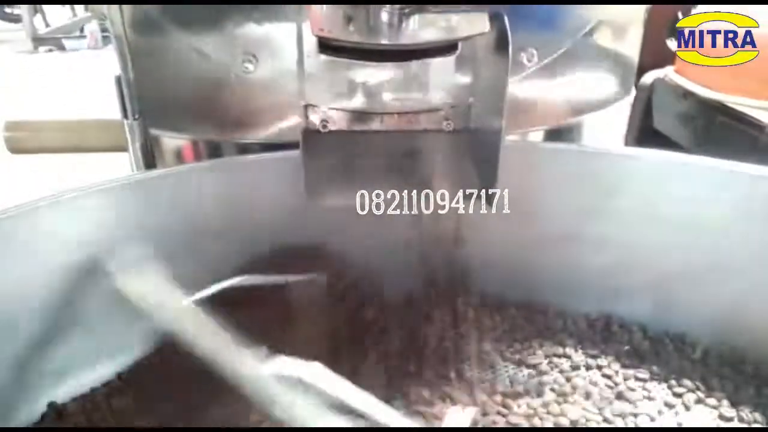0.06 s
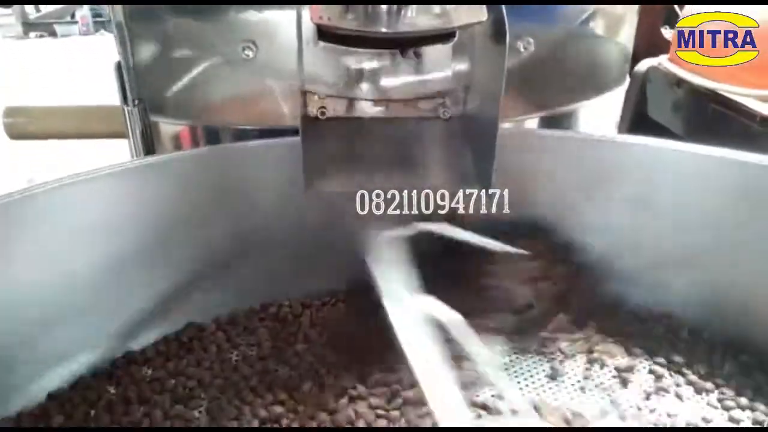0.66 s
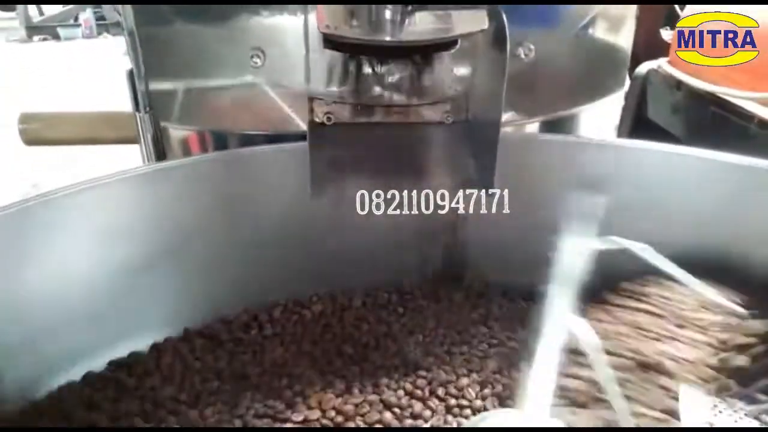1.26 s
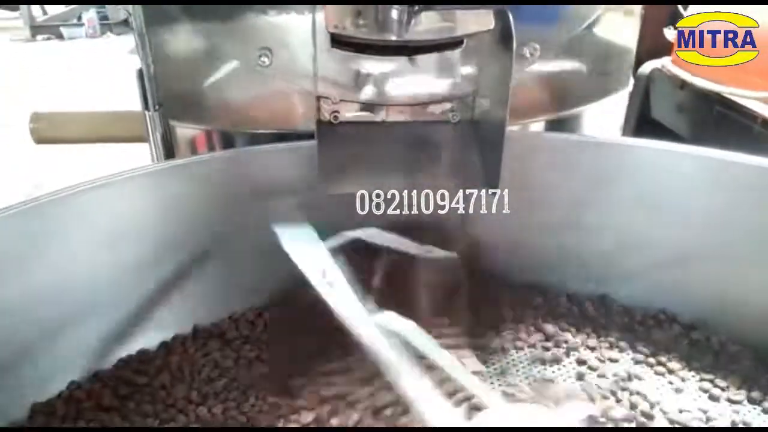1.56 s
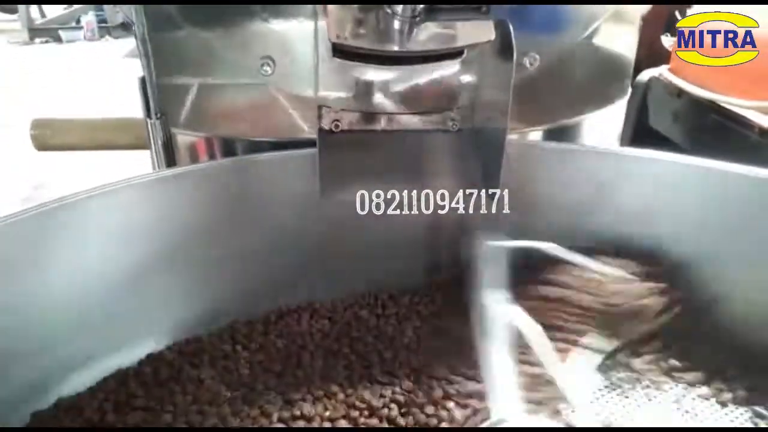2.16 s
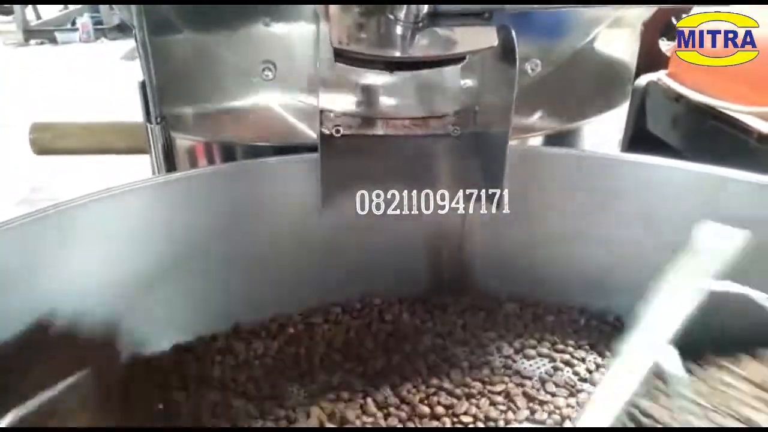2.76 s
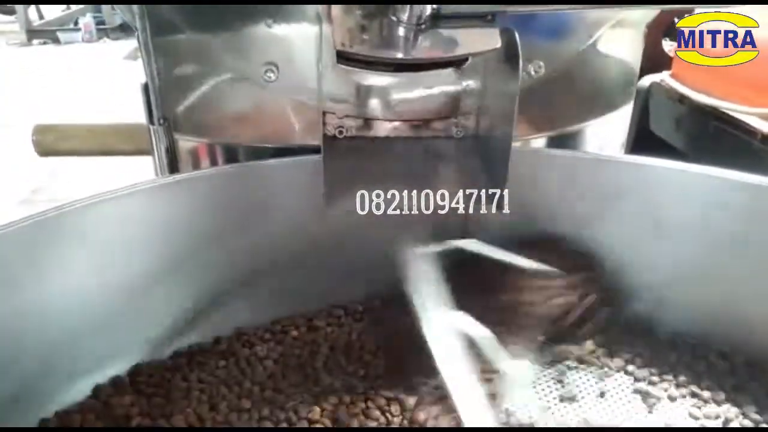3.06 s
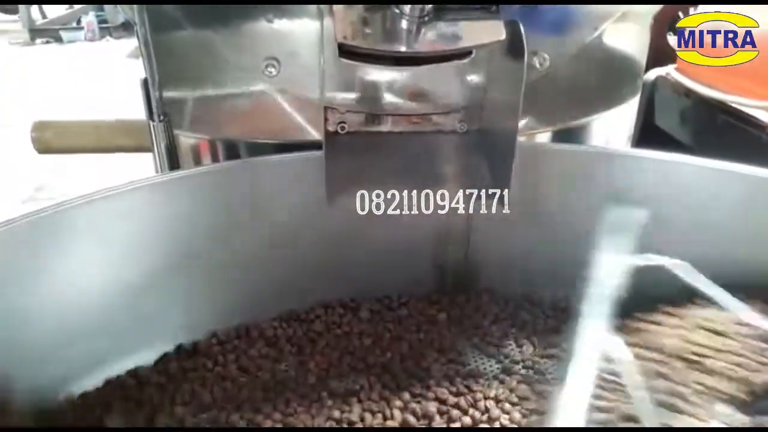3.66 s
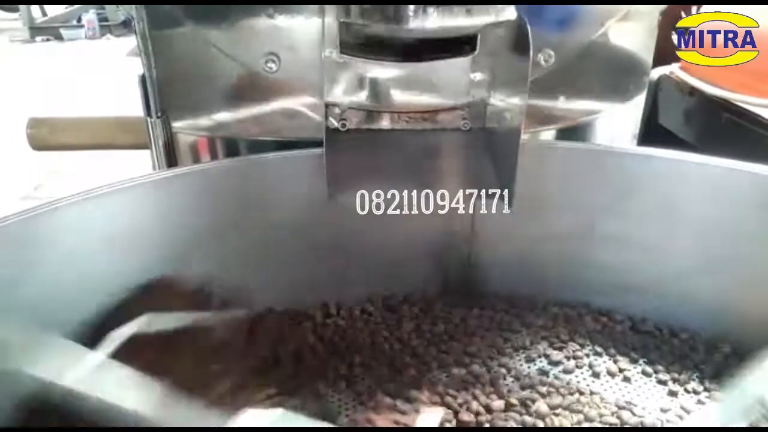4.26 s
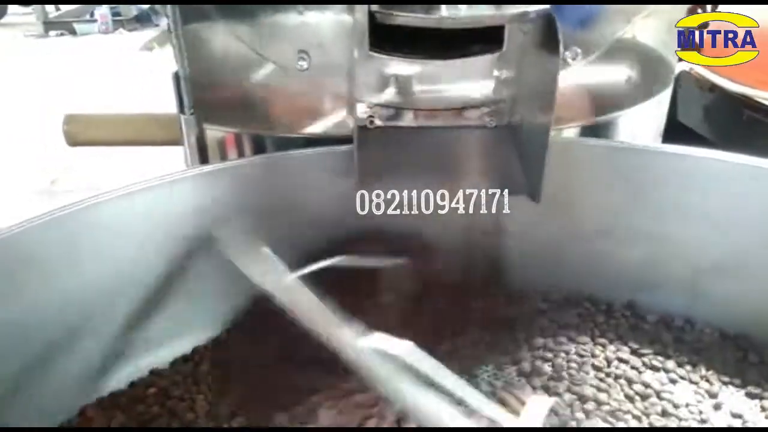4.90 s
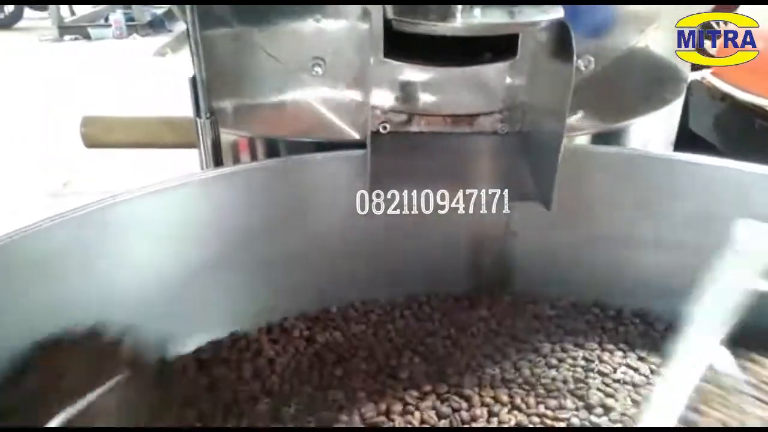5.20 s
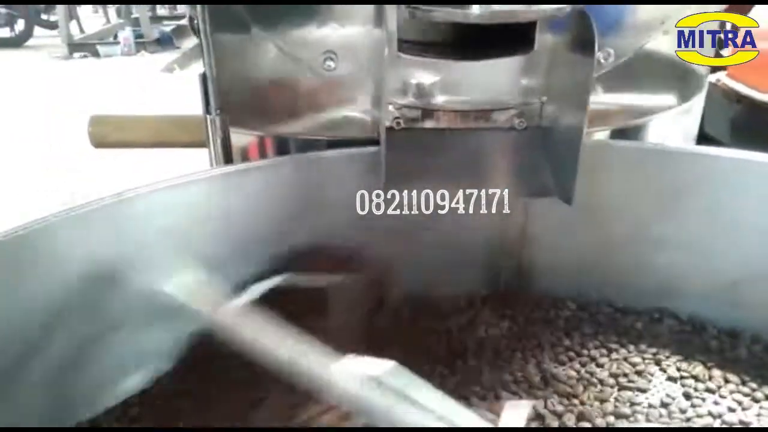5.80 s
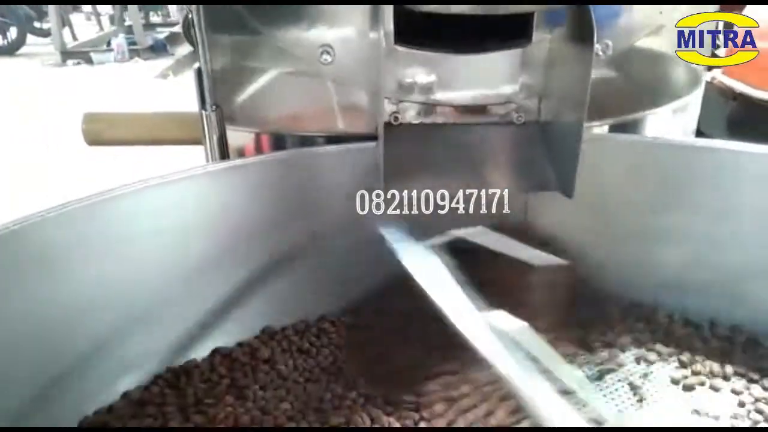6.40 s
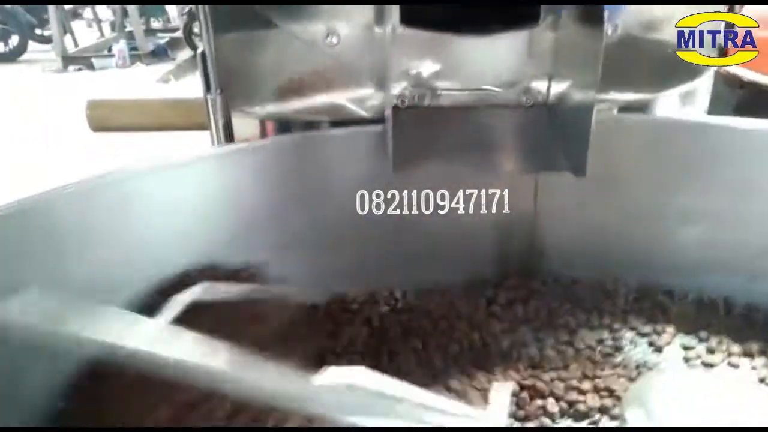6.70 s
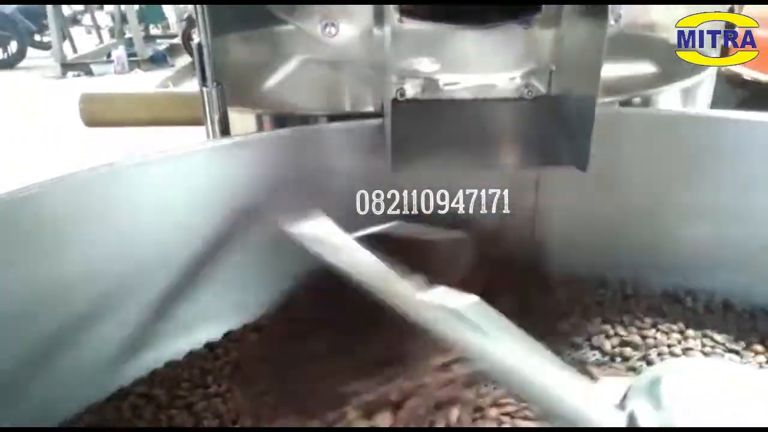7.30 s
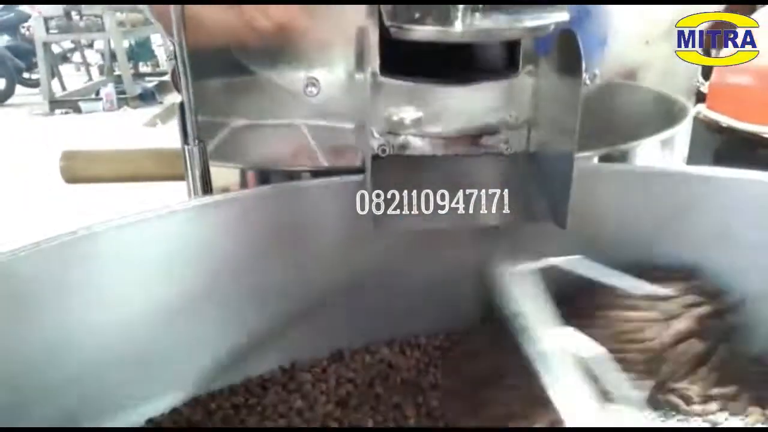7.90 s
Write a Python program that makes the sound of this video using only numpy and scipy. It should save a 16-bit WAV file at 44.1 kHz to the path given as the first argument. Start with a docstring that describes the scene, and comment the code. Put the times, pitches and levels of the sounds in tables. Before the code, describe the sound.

Steel paddles sweep roasted coffee beans round a perforated cooling tray, close to a hand-held microphone, for about eight seconds. Grinding swells with each pass, roughly every 0.8 seconds, and the dry beans hiss as they heap up and slide. The drum shudders and booms unevenly throughout, over a steady suction fan and a thin, wavering motor whine. Short steel squeaks come and go, noticeably around 0.5, 1.3, 2.9 and 4.5 seconds. Jammed beans snap free with brief metallic knocks at about 2.2 seconds, most sharply at 3.8, then several times between 4.3 and 6. A panel hums faintly and low from about 2.8 seconds and again from 7.2. Stronger booms gather around 3.9 and 6.5 seconds. The microphone takes one dull bump at 6.9 seconds, and a cluster of brighter squeaks and a knock arrives just before 8 as the stirring continues.

```python
"""Coffee roaster cooling tray.

Steel paddles sweep roasted beans round the tray, close to a hand-held microphone. The arms grind and
knock on the perforated floor, the drum booms and panels hum; the beans hiss as they heap up and slide.
Steel squeaks now and then and the microphone is bumped once. Underneath: a suction fan and the thin,
wavering whine of the motor."""
import sys
import numpy as np
from scipy import signal
from scipy.fft import rfft, irfft
from scipy.io import wavfile
from scipy.ndimage import uniform_filter1d

SR = 44100
rng = np.random.default_rng(int(sys.argv[2]) if len(sys.argv) > 2 else 0)


def master(y):
    """Save y as 16-bit WAV."""
    cut = np.clip(np.atleast_2d(y).T, -1, 1)
    pcm = np.round(cut * 32767)  # scale
    wavfile.write(sys.argv[1], SR, pcm.astype(np.int16))


N = 355005
T = np.arange(N) / SR
SLOW_T = T[::64]

# A paddle passes the microphone. Each row: nearest point in seconds, time to draw away in seconds,
# then relative grinding, hiss and bite (treble gain), all in dB.
PADDLE_PASSES = [(.58, 0.15, -28, -33.5, 2), (1.4, 0.29, -23, -29.5, -2), (2.23, .18, -25.5, -36, 2),
                 (3.03, 0.11, -22, -27.5, 0), (3.88, 0.21, -26, -30, 2), (4.65, 0.4, -24.5, -28, -4.5),
                 (5.49, 0.29, -25, -30.5, -0.5), (6.28, 0.41, -25, -33.5, 0), (6.97, .17, -35, -31, 0.5),
                 (7.94, 0.11, -23, -27, -0.5)]
# A heap gives way before a paddle. Each row: start and length in seconds, relative grinding and hiss in dB.
HEAP_SLIPS = [(-.03, 0.17, -34, -26), (0.332, .02, -27.5, -48), (0.422, .06, -28, -33),
              (0.543, 0.071, -29.5, -42), (0.814, 0.091, -25, -30.5), (1.424, .12, -45, -25),
              (1.606, 0.084, -28.5, -31), (1.757, .03, -30, -27.5), (1.985, 0.042, -30, -36),
              (2.404, .13, -28, -40), (2.693, 0.051, -29.5, -31), (3.158, 0.13, -31, -38),
              (3.358, 0.14, -31, -35.5), (3.623, .027, -34, -31.5), (4.089, 0.042, -29.5, -29),
              (4.34, .03, -30, -34), (5.088, 0.083, -27, -52), (5.444, .02, -26.5, -26),
              (5.624, 0.2, -28.5, -27.5), (5.895, 0.14, -33, -31.5), (6.499, 0.22, -26, -33.5),
              (6.783, 0.09, -23, -29), (7.034, 0.12, -31.5, -26), (7.556, 0.059, -26, -30),
              (7.874, 0.018, -32, -23)]
# Broad spectra of tray, beans, drum and fan. Each row: frequency in Hz, relative density in dB.
TRAY_SPECTRUM = [(60, -45.5), (200, -3), (280, -6), (450, -2.5), (750, 1), (1300, 2.5), (1900, -0.5),
                 (2400, -1), (2800, -7), (3300, -13.5), (4000, -15.5), (5500, -16), (8000, -17.5),
                 (14000, -49)]
BEAN_SPECTRUM = [(500, -12.5), (2000, 2.5), (3800, -11), (4800, -9.5), (5600, -4.5), (7200, -3.5),
                 (8300, 0), (10000, 1.5), (12000, 1), (14300, -1)]
DRUM_SPECTRUM = [(30, -41), (55, -14), (80, -14.5), (100, -5), (118, -8.5), (145, 0.5), (178, 3.5),
                 (195, -4.5), (212, -14.5), (270, -19), (380, -39), (900, -57)]
FAN_SPECTRUM = [(20, -35), (36, -6), (58, -1), (100, 23.5), (170, -4), (260, 3), (450, 11.5), (800, 11),
                (1700, -20), (2600, 8), (3600, -11.5), (5500, 8), (9000, -13), (14000, 8.5)]
# Tray modes. Each row: centre in Hz, width in Hz, gain in dB (negative for a dead spot).
TRAY_RESONANCES = [(324, 33, 9.5), (374, 26.3, -20), (466, 42, 5), (521, 35, -12), (590, 24, 3.5),
                   (665, 31, -7.5), (755, 17, 7.5), (904, 70, 5.5), (987.7, 31, 9), (1087, 130, -6),
                   (1326, 39, 3), (1629, 67, 4), (1695, 69, 6.5), (2310, 43, 4), (2720, 30, 9)]
# An arm jolts the drum hard. Each row: time in seconds, relative level in dB, pitch in Hz.
DRUM_BOOMS = [(.071, -20, 158), (.271, -12, 163), (.336, -16, 170.4), (0.897, -16, 176), (1.451, -17, 158),
              (1.509, -15.5, 149), (1.78, -13, 167), (1.912, -17, 169.6), (2.165, -17.5, 171),
              (2.227, -12.5, 152), (2.538, -15, 176), (2.739, -21, 154), (2.835, -20.5, 156),
              (3.384, -14.5, 177), (3.861, -18, 172.5), (3.906, -11.5, 170.5), (3.962, -14.5, 162),
              (4.35, -20, 169), (4.479, -16, 160), (5.008, -18, 172), (5.418, -14, 175.6),
              (5.799, -14.5, 176), (5.999, -17, 168), (6.379, -14, 177), (6.418, -10.5, 173),
              (6.46, -17, 171), (6.581, -11, 163), (7.079, -15.5, 173.4), (7.74, -16.5, 166)]
# Drum shudder between booms. Each row: time in seconds, level in dB.
DRUM_SHUDDER = [(0, -31.5), (.75, -35), (3.1, -34.5), (3.6, -31), (4.2, -35.5), (4.55, -29.5), (6.5, -32),
                (7.35, -34), (8.05, -30.5)]
# A jammed bean snaps free. Each row: start in seconds, level in dB, ring pitch in Hz.
BEAN_SNAPS = [(2.238, -22, 1430), (3.846, -17, 2140), (4.338, -27.5, 1340), (4.519, -27, 991),
              (4.663, -22.5, 1260), (4.808, -21.5, 1760), (5.482, -19.5, 1310), (5.704, -21, 1730),
              (5.804, -22, 1290), (6.016, -26, 1620), (7.053, -22.5, 1490), (7.949, -19.5, 1280)]
# An arm scrapes steel. Each row: start in seconds, length in seconds, pitch in Hz, relative level in dB.
STEEL_SQUEAKS = [(0, 0.079, 7765, -30), (0, 0.24, 8250, -33), (0.398, 0.26, 749, -29.5),
                 (0.515, 0.15, 991, -25.5), (0.762, 0.084, 740, -30), (1.24, 0.22, 991, -23.5),
                 (1.413, .14, 2680, -30), (1.46, .086, 11280, -30), (2.103, 0.083, 5630, -35),
                 (2.111, 0.09, 1610, -32), (2.734, 0.13, 603, -33), (2.826, 0.26, 1647, -28.5),
                 (2.997, .11, 597, -28), (4.104, .11, 1726, -30.5), (4.495, 0.21, 990, -27),
                 (5.438, .055, 5700, -33), (5.636, .17, 1737, -28), (7.758, 0.13, 1357, -23.5),
                 (7.827, 0.12, 6700, -27), (7.828, 0.1, 4150, -37), (7.879, 0.022, 9650, -19),
                 (7.903, 0.056, 1720, -20.5)]
# A large panel hums. Each row: start in seconds, pitch in Hz, relative level in dB, T60 in seconds.
PANEL_HUMS = [(.58, 56, -45, 2), (2.8, 60.3, -31, 3.4), (7.169, 73.5, -31, 5.2)]
# The whine sags and recovers with motor load. Each row: time in seconds, pitch in Hz.
WHINE_PITCH = [(0, 5375), (.3, 5355), (.8, 5185), (1.48, 5145), (1.88, 5340), (2.8, 5378), (4.55, 5524),
               (5.05, 5492), (5.65, 5528), (6.8, 5422), (7.15, 5370), (8.05, 5386)]
# The whine flares. Each row: peak time in seconds, half length in seconds, level in dB.
WHINE_FLARES = [(.34, .06, -43), (.83, .06, -43), (1.72, .05, -41), (2.306, 0.089, -41), (2.68, 0.15, -44),
                (4.58, .13, -39), (6.79, 0.074, -43), (7.208, 0.094, -45), (7.95, 0.18, -41.5)]


def grinding(effort, level_db=-0.5, judder_db=0.76, bite_hz=1900):
    """Beans dragged over the holes tap the tray; each contact briefly excites modes of the steel."""
    taps = impacts(per_s=5000, spread_db=2.5) * amp(judder_db * drift(47))
    taps = patchy(taps, depth_db=4.0, length_s=0.05, width_hz=150)
    treble = signal.sosfiltfilt(signal.butter(4, bite_hz, "high", fs=SR, output="sos"), taps)
    bite = amp(curve(PADDLE_PASSES, column=4))  # a sharper bite lifts the upper modes
    drive = taps - treble + treble * bite
    return unit(colour(drive, TRAY_SPECTRUM, TRAY_RESONANCES)) * effort * amp(level_db)


def bean_hiss(flow, level_db=2.0, clump_db=1.36):
    """Thousands of dry beans tick against each other and the steel, sliding in clumps."""
    ticks = impacts(per_s=15000, spread_db=1.5) * amp(clump_db * drift(27))
    ticks = patchy(ticks, depth_db=2.15, length_s=0.07, width_hz=260)
    return unit(colour(ticks, BEAN_SPECTRUM)) * flow * amp(level_db)


def stirring(approach_s=0.38, hiss_swell_s=0.25, far_grind_db=-35.5, far_hiss_db=-37.5):
    """Grinding and hiss gains: steady far paddles, plus passing paddles and slipping heaps."""
    grind, hiss = [], []
    for nearest_s, leave_s, grind_db, hiss_db, _ in PADDLE_PASSES:
        grind.append(amp(grind_db) * swell(nearest_s, approach_s, leave_s))
        hiss.append(amp(hiss_db) * swell(nearest_s, hiss_swell_s, hiss_swell_s))
    for start_s, length_s, grind_db, hiss_db in HEAP_SLIPS:
        slide = heap_slip(start_s, length_s)
        grind.append(amp(grind_db) * slide)
        hiss.append(amp(hiss_db) * slide)
    return power_sum(far_grind_db, grind), power_sum(far_hiss_db, hiss)


def heap_slip(start_s, length_s, attack_s=0.018, release_s=0.12):
    """Envelope of a heap that gives way, slides and settles."""
    t = SLOW_T - start_s
    return np.clip(t / attack_s, 0, 1) * np.exp(-np.maximum(t - length_s, 0) / release_s)


def drum(uneven_db=2.2, boom_db=-4, rise_s=0.019, lead_s=0.00787):
    """The drum shudders unevenly under the arms and booms at each hard jolt."""
    jolts = impacts(per_s=500, spread_db=2) * amp(uneven_db * drift(11))
    out = unit(colour(jolts, DRUM_SPECTRUM)) * amp(curve(DRUM_SHUDDER))
    t = T[:SR // 4]
    envelope = (t / rise_s) ** 2 * np.exp(2 - 2 * t / rise_s)
    for at_s, db, hz in DRUM_BOOMS:
        add(out, at_s - lead_s, amp(db + boom_db) * envelope * np.sin(2 * np.pi * hz * t))
    return out


def knocks(t60_s=0.13, ring_width_hz=550, crack_gain=0.58):
    """A bean jams under a paddle and snaps free: a short tray rattle, strongest round one pitch."""
    out, t = np.zeros(N), T[:SR // 5]
    for start_s, db, hz in BEAN_SNAPS:
        rattle = rng.standard_normal(len(t))
        ring = unit(resonate(rattle, hz, ring_width_hz))
        blow = (ring + crack_gain * rattle) * amp(-60 * t / t60_s)
        knock = colour(blow, TRAY_SPECTRUM, TRAY_RESONANCES)
        add(out, start_s, amp(db) * knock / np.std(knock[:SR // 100]))
    return out


def squeaks(level_db=-5.0, rough_db=3, shake_at_1khz_hz=15):
    """Rubbing sustains a steel mode; stick-slip shakes its level and pitch, high pitches the most."""
    out = np.zeros(N)
    shake, roughness = drift(136), amp(rough_db * drift(70))
    for start_s, length_s, hz, db in STEEL_SQUEAKS:
        span = int(length_s * SR)
        offset = rng.integers(N - SR)
        pitch_hz = hz + shake_at_1khz_hz * np.sqrt(hz / 1000) * shake[offset:][:span]
        ring = np.sin(2 * np.pi * np.cumsum(pitch_hz) / SR) * roughness[offset:][:span]
        add(out, start_s, amp(db + level_db) * unit(ring * signal.windows.tukey(span, 0.5)))
    return out


def panel_hums(rise_s=0.013, waver_db=3.0):
    """A low panel mode swells quickly and dies slowly, wavering."""
    out = np.zeros(N)
    for start_s, hz, db, t60_s in PANEL_HUMS:
        envelope = amp(db - 60 * T / t60_s) * (1 - np.exp(-T / rise_s))
        add(out, start_s, envelope * np.sqrt(2) * np.sin(2 * np.pi * hz * T))
    return out * amp(waver_db * drift(8))


def microphone_bump(start_s=6.8965, wobble_hz=57, wobble_db=-7, rise_s=0.001, t60_s=0.11):
    """Two dull taps on the microphone case and the low wobble they start."""
    out, t = np.zeros(N), T[:SR // 5]
    envelope = amp(wobble_db - 60 * t / t60_s) * (1 - np.exp(-t / rise_s))
    add(out, start_s, envelope * np.sin(2 * np.pi * wobble_hz * t + np.pi / 5))
    for at_s, width_s, tap_db in [(6.8956, 0.00096, -4.5), (6.9021, 0.00019, -2.5)]:
        out -= amp(tap_db) * np.exp(-((T - at_s) / width_s) ** 2)
    return out


def fan(level_db=-38):
    """Air drawn through the tray: steady noise coloured by its modes."""
    return amp(level_db) * unit(colour(rng.standard_normal(N), FAN_SPECTRUM, TRAY_RESONANCES))


def motor_whine(steady_db=-51, jitter_ratio=0.0025, flutter_db=3):
    """The motor's faint tone wanders, flutters and flares."""
    pitch_hz = curve(WHINE_PITCH) * (1 + jitter_ratio * drift(220))
    tone = np.sin(2 * np.pi * np.cumsum(pitch_hz) / SR)
    flutter = amp(flutter_db * drift(35))
    flares = [amp(db) * swell(peak_s, half_s, half_s) for peak_s, half_s, db in WHINE_FLARES]
    return unit(tone * flutter) * power_sum(steady_db, flares)


def impacts(per_s, spread_db):
    """Random clicks, most small, a few large; rms 1."""
    size = amp(spread_db * np.minimum(rng.exponential(1, N), 4))
    return unit(size * rng.choice([-1, 1], N) * (rng.random(N) < per_s / SR))


def patchy(x, depth_db, length_s, width_hz):
    """Random gain in small patches of time and frequency."""
    frames = dict(nperseg=1024, noverlap=768)
    hz, t, spectra = signal.stft(x, SR, **frames)
    field = rng.standard_normal(spectra.shape)
    for axis, span in enumerate([width_hz / hz[1], length_s / t[1]]):
        field = uniform_filter1d(field, max(round(span), 1), axis)
    return signal.istft(spectra * amp(depth_db * unit(field)), SR, **frames)[1][:N]


def colour(x, spectrum, modes=(), size=8192):
    """Minimum-phase filter of unit energy: a broad spectrum plus resonances."""
    hz = abs(np.fft.fftfreq(size, 1 / SR))
    points_hz, points_db = np.transpose(spectrum)
    db = np.interp(np.log(hz + 1), np.log(points_hz), points_db)
    for centre_hz, width_hz, gain_db in modes:
        db += gain_db / (1 + (2 * (hz - centre_hz) / width_hz) ** 2)
    response = np.exp(np.conj(signal.hilbert(np.log(amp(db)))))
    impulse = np.fft.ifft(response).real[:size // 2]
    return signal.oaconvolve(x, impulse / np.linalg.norm(impulse))[:len(x)]


def resonate(x, hz, width_hz):
    """One resonance."""
    pole = np.exp((2j * np.pi * hz - np.pi * width_hz) / SR)
    return signal.lfilter([1], [1, -pole], x).real


def swell(peak_s, before_s, after_s):
    """Bell envelope with separate rise and fall times."""
    away = np.minimum(abs(SLOW_T - peak_s) / np.where(SLOW_T < peak_s, before_s, after_s), 10)
    return np.exp(-away ** 2)


def power_sum(steady_db, envelopes):
    """Audio-rate gain: a steady level and slow envelopes, added in power."""
    power = amp(steady_db) ** 2 + sum(envelope ** 2 for envelope in envelopes)
    return np.interp(T, SLOW_T, np.sqrt(power))


def drift(rate_hz):
    """Slow noise up to about rate_hz; rms 1."""
    rolloff = np.exp(-(np.fft.rfftfreq(N, 1 / SR) / rate_hz) ** 2)
    return unit(irfft(rfft(rng.standard_normal(N)) * rolloff, N))


def curve(rows, column=1):
    """A table column, interpolated linearly in time."""
    rows = np.asarray(rows)
    return np.interp(T, rows[:, 0], rows[:, column])


def add(mix, start_s, sound):
    """Mixes a sound in at start_s."""
    part = mix[max(round(start_s * SR), 0):][:len(sound)]
    part += sound[:len(part)]


def amp(db):
    """Decibels to gain."""
    return 10 ** (np.asarray(db) / 20)


def unit(x):
    """Scales to rms 1."""
    return x / np.sqrt(np.mean(x ** 2) + 1e-20)


def scene():
    """All sources at one microphone, the same in both channels."""
    effort, flow = stirring()
    tray = grinding(effort) + bean_hiss(flow) + drum() + knocks() + squeaks() + panel_hums()
    mono = tray + microphone_bump() + fan() + motor_whine()
    return np.array([mono, mono])


def record(dry, cutoff_hz=14270):
    """Steep low-pass."""
    taps = signal.firwin(1023, cutoff_hz, window=("kaiser", 9), fs=SR)
    return signal.oaconvolve(dry, taps[None], "same", axes=1)


dry = scene()
out = record(dry)
master(out)
```